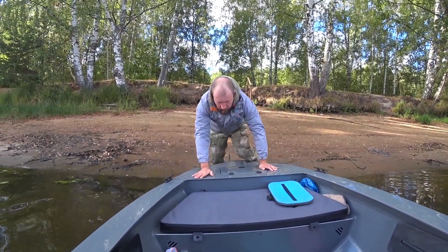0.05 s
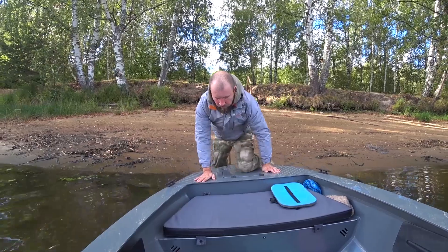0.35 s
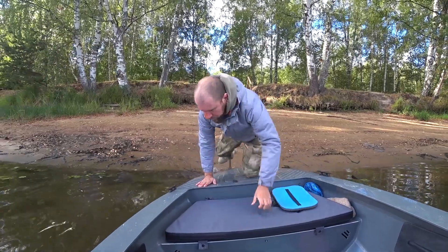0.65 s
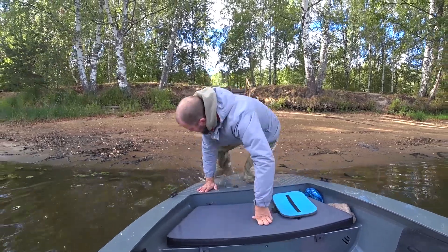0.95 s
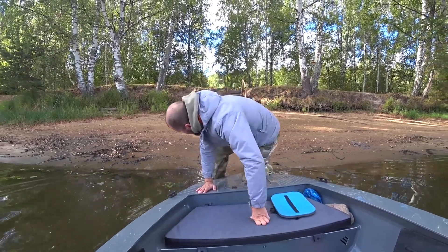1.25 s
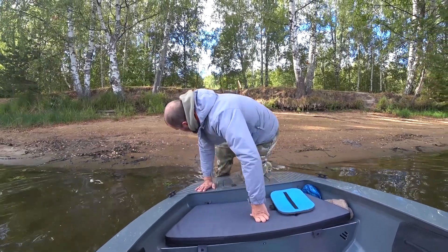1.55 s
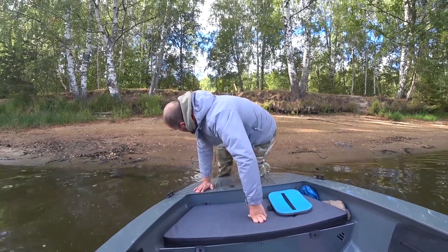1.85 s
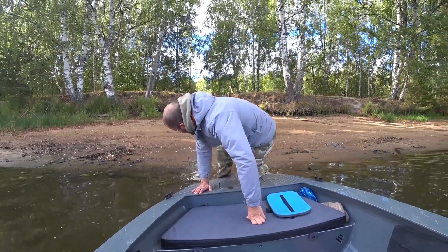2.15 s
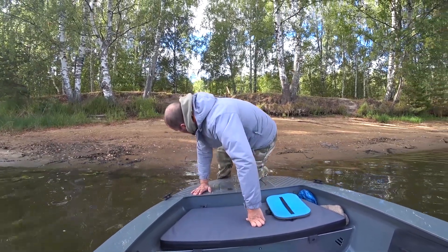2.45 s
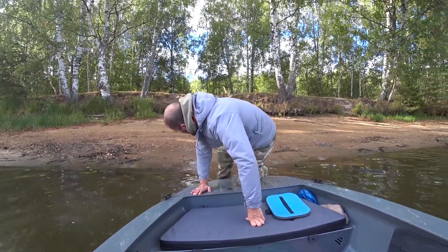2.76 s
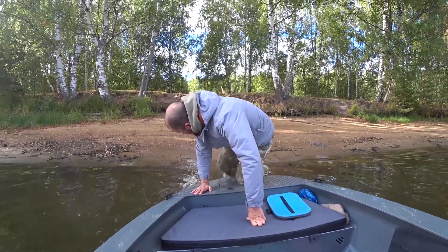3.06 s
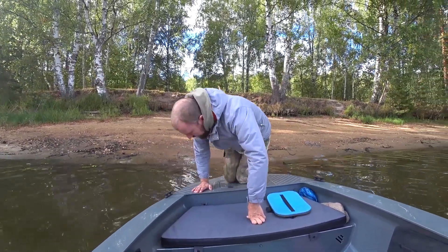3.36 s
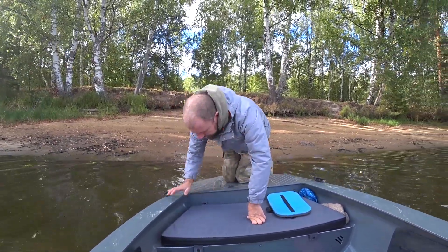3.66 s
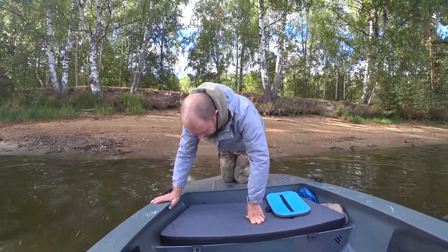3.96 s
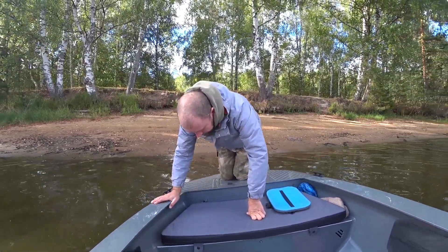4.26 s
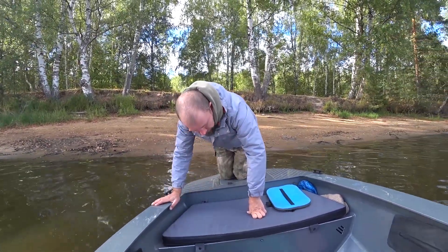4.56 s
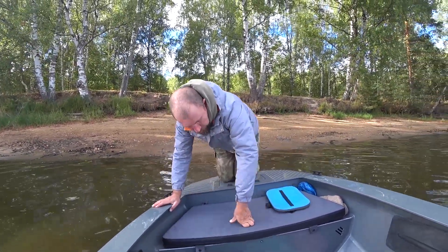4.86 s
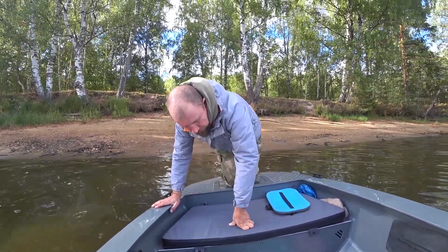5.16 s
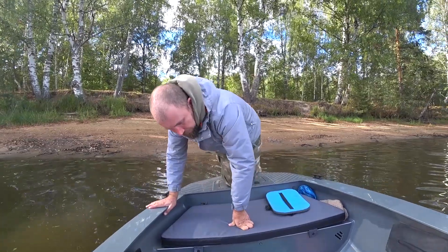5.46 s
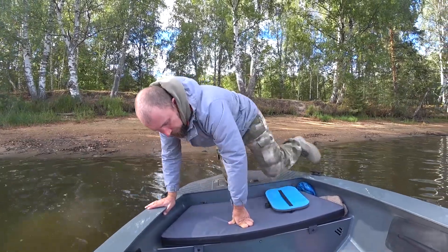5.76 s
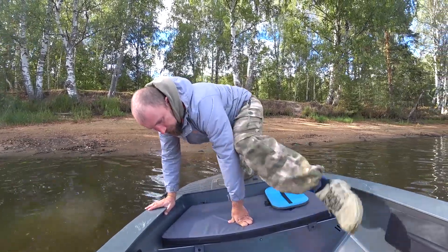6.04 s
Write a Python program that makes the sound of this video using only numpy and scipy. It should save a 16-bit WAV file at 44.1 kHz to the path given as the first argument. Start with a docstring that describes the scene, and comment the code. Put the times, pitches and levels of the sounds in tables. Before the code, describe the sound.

Someone pushes a small plastic boat off a lake shore, heard from on board. A cluster of hollow thumps and a sharp snap comes first. Wavelets then slap the bow, and water sloshes and drips around wading legs. A longer run of knocks follows as hands, knees and boots land on the hull, with scuffs and swishing clothes. A low hull rumble and a light breeze sit underneath.

```python
"""Hands, knees and boots knock on a small hollow plastic boat, pushed off a sandy lake shore.
Heard from on board: each blow rings the hull and wall modes; short clicks sound, a fitting snaps.
Palms and keel scuff, clothes swish as someone climbs in. Wavelets slap the bow; round wading legs,
water drips, splashes and sloshes with ringing bubbles. Behind: the rumble of the rocking hull,
an echo off the wooded bank, a light breeze in the trees."""
import sys
import numpy as np
from scipy import signal
from scipy.fft import rfft, irfft, next_fast_len
from scipy.io import wavfile
from scipy.ndimage import map_coordinates

SR = 44100
rng = np.random.default_rng(int(sys.argv[2]) if len(sys.argv) > 2 else 0)


def put_to_file(sound):
    """Save the sound as 16-bit audio at rate SR, in the file named by the first command-line argument."""
    columns = np.atleast_2d(sound).T  # one column per channel
    safe = np.clip(columns, -1, 1)
    whole_steps = np.round(safe * 32767)
    wavfile.write(sys.argv[1], SR, whole_steps.astype(np.int16))


N = 277824
AGE_S = np.arange(SR // 2) / SR  # since a contact
NOW_S = np.arange(N) / SR
PAN = np.array([[1], [-1]])  # left, right
BAND_HZ, TOP_HZ = 11200, 17000

# blows on the hull: t/s, level/dB, thud f/Hz, boom/dB re level, knock/dB re level
BLOWS = [(0.368, -36, 172, -10, -30), (0.411, -22.5, 125, 4, -9), (0.421, -19.5, 127, -6.5, -8),
         (0.434, -14.5, 194, -8, -8), (0.468, -21.5, 115, -28, -12.5), (0.495, -32, 105, -8, -8),
         (0.536, -25.5, 115, -22, -12), (0.63, -28, 134, -24, -27), (0.761, -20.5, 146, -14, -4.5),
         (0.786, -20, 151, -11.5, -6), (0.799, -13.5, 106, -17, -25), (3.334, -48.5, 431, -8, 10.5),
         (3.458, -34.5, 180, -7.5, -12), (3.619, -43, 300, -12, -1), (3.806, -23, 294, -28, -17),
         (3.818, -28, 150, -24, -6.5), (3.982, -17.5, 167, -34, -21), (3.987, -15, 226, -19, -4.5),
         (3.993, -17.5, 165, -21, -18), (4.268, -18, 228, -28, -8.5), (4.277, -13, 273, -17.5, -11.5),
         (4.331, -27, 170, -15, -14), (4.538, -20.5, 190, -13, -7), (4.55, -22.5, 423, -15, -3),
         (4.619, -40.5, 480, -5, 2.5), (4.662, -35, 154, -10, -22), (4.909, -25.5, 135, -15, -9),
         (5.116, -33.5, 182, -13, -13), (5.192, -15.5, 166, -23, -20), (5.205, -21, 100, -6, -34),
         (5.274, -42, 140, 10.5, 6), (5.331, -20.5, 324, -5, -12.5), (5.355, -23.5, 135, -2.5, -19.5),
         (5.536, -32, 275, -9.5, -2), (5.666, -21.5, 255, -9, -10), (6.065, -31, 208, -17, -8.5),
         (6.095, -34.5, 153, -15, -7)]
# hollow shell modes: f/Hz, level/dB, t60/s
HULL_MODES = [(38.4, -13.5, 0.48), (50.5, -4, 0.27), (62.5, 5.5, 0.19), (94.7, 4.5, 0.16),
              (113.8, 4.5, 0.13), (140.7, -10.5, 0.11), (159, -3, 0.15), (179.4, -0.5, 0.11),
              (225.4, -1, 0.093), (252.2, 1.5, 0.09), (295.7, 4, 0.076), (348.2, 8.5, 0.05),
              (398, 6, 0.042), (426, 6, 0.02), (510, 1.5, 0.059)]
# decay of the dense wall modes: f/Hz, t60/s
WALL_DECAY = [(300, 0.096), (800, 0.044), (2000, 0.03), (5000, 0.06), (11000, 0.02)]
# contact crack spectrum: f/Hz, level/dB
CRACK_EQ = [(1200, 11.5), (2500, 4), (4500, 2), (6500, 0.5), (10000, -10), (14000, -33)]
# short pitched clicks and rings, including two faint echoes of the snap and a splash's bright tick:
# t/s, level/dB, f/Hz
CLICKS = [(0.226, -32.5, 4360), (0.4424, -2, 5210), (0.4429, -21, 4700), (.513, -35, 2380),
          (.5336, -32.5, 2400), (0.632, -24.5, 95.5), (.763, -21.5, 660), (.788, -23.5, 544),
          (3.337, -32.5, 3060), (3.799, -35.5, 1300), (3.807, -21, 336), (3.811, -28.5, 1790),
          (3.818, -32, 1620), (3.825, -35, 114), (3.989, -16.5, 1925), (4.2697, -25, 4260),
          (4.270, -24.5, 1105), (4.279, -21.5, 2130), (4.333, -28, 206), (4.448, -36, 202),
          (4.551, -20, 526), (4.620, -28, 6000), (5.193, -19, 403), (5.274, -33, 1940),
          (5.325, -34.5, 1000), (5.332, -17.5, 364), (5.537, -29, 4480), (5.539, -25, 1137),
          (5.540, -26.5, 630), (5.6615, -20, 4400), (5.664, -26, 1103), (5.668, -22, 670)]
# palms, knees and keel sliding: centre t/s, level/dB, sigma/s, grit share 0-1
SCUFFS = [(0.443, -37.5, 0.012, 0.5), (0.763, -35, 0.0031, 0.5), (0.781, -33, 0.0069, 0.04),
          (0.81, -45.5, 0.031, 0.6), (1.108, -55.5, 0.044, 0.98), (2.812, -55, 0.016, 1),
          (2.912, -54.5, 0.012, 0.3), (3.608, -53, 0.009, .8), (3.819, -46, 0.013, 0.4),
          (4.856, -37, 0.036, 0.92), (5.406, -50, 0.026, 0.6), (6.248, -47.5, 0.025, .5)]
# gritty slip spectrum: f/Hz, level/dB
GRIT_EQ = [(300, -43), (700, -4.5), (1600, -3), (3000, -8), (5500, 3), (8000, -5.5), (11000, -10)]
# cloth and smooth rubbing spectrum: f/Hz, level/dB
RUB_EQ = [(600, -1), (2000, 5), (4000, 4), (5700, 3.5), (8000, -4.5), (11000, -8)]
# shoves and strides: centre t/s, sigma/s, water level/dB, cloth level/dB
MOVES = [(0.603, 0.28, -53.5, -64), (1.185, 0.21, -48, -58.5), (2.815, 0.084, -53, -63.5),
         (3.582, 0.06, -47.5, -67), (4.094, 0.075, -57, -65.5), (4.82, 0.21, -50.5, -54.5),
         (5.367, 0.26, -51, -75), (6.24, 0.24, -52, -58.5)]
# wavelets under the bow: t/s, slap level/dB, thud level/dB
LAPS = [(0.932, -32.5, -38), (0.997, -38.5, -41), (1.187, -32, -30), (1.379, -63, -41), (4.743, -33.5, -33)]
# splashes: t/s, level/dB, f/Hz
SPLASHES = [(0.225, -38.5, 1480), (1.336, -38, 3930), (1.343, -37, 1320), (1.394, -34.5, 3470),
            (1.407, -33, 2160), (1.542, -33.5, 1770), (1.771, -39, 4500), (1.819, -42.5, 4040),
            (2.295, -38, 5500), (2.357, -28.5, 2490), (2.366, -34.5, 4630), (2.724, -35.5, 4600),
            (2.779, -38, 1540), (2.820, -34, 872), (3.296, -34, 2830), (3.589, -35, 760),
            (5.72, -32.5, 6000)]
# single bubbles: t/s, level/dB, f/Hz
BUBBLES = [(.821, -34.5, 3760), (.909, -34.5, 3880), (1.301, -41.5, 2270), (1.344, -33.5, 4150),
           (1.359, -34, 1335), (1.410, -35.5, 2060), (1.526, -40.5, 1150), (2.349, -39, 1790),
           (2.356, -34.5, 2330), (3.009, -46, 2390), (3.109, -38, 6160), (3.620, -40.5, 653),
           (3.708, -47.5, 890)]
# stirred water spectrum: f/Hz, level/dB
WASH_EQ = [(150, -5), (400, 2), (900, -1.5), (2000, -9), (4000, -17), (9000, -25)]
# rocking hull spectrum: f/Hz, level/dB
RUMBLE_EQ = [(15, -6), (42, -3), (70, -8.5), (110, -10.5), (200, -11.5), (400, -17), (900, -65)]
# bank echo spectrum: f/Hz, level/dB
BANK_EQ = [(150, -12), (500, -11), (1300, -10), (1900, -2), (2250, 0), (2800, -12), (5000, -20),
           (9000, -22)]
# breeze spectrum: f/Hz, level/dB
BREEZE_EQ = [(12, -43), (20, -2), (49, -11.5), (129, -16), (282, -8), (418, -10), (464, -12.5),
             (1050, -14.5), (1160, -17), (1320, -13), (2980, -21), (5450, -21.5), (10500, -29.5),
             (13600, -65), (22000, -120)]
# breeze strength: t/s, level/dB
BREEZE_LEVELS = [(0, -54.5), (2.1, -56.5), (2.55, -59), (3.0, -56.5), (6.3, -53)]
# open-air stereo field: f/Hz, left-right coherence
AIR_COHERENCE = [(100, 0.95), (300, 0.36), (800, 0.057), (2000, 0.033), (8000, 0.6)]
# stereo field on the bow: f/Hz, left-right coherence
BOW_COHERENCE = [(150, 0.64), (600, 0.79), (2000, 0.63), (8000, 0.86)]
# bow balance: f/Hz, left minus right/dB
BOW_BALANCE = [(120, .1), (260, -.6), (550, -2.8), (1200, -2.2), (2200, -3.4), (5000, -3), (9000, -3.5)]


def blows(boom_hz=56.3, soft_knock_hz=628, soft_knock_db=-35, db_per_octave=26):
    """Each blow thuds in a panel, booms in the shell, knocks and cracks; harder knocks are brighter."""
    out = np.zeros((2, N))
    for t_s, db, thud_hz, boom_db, knock_db in BLOWS:
        knock_hz = soft_knock_hz * 2 ** (max(db + knock_db - soft_knock_db, 0) / db_per_octave)
        thud = shell_ring(thud_hz, octaves=0.49, rise_s=0.0052, damping=1.3)
        boom = shell_ring(boom_hz, octaves=0.59, rise_s=0.0078, damping=1.0)
        knock = slap(lambda hz: bell(hz, knock_hz, octaves=1.0), rise_s=0.0014, damping=1.2)
        crack = slap(lambda hz: amp(curve(CRACK_EQ, hz)), rise_s=0.0006, damping=1.67)
        add(out, t_s, amp(db - 8) * thud)
        add(out, t_s, amp(db + boom_db) * boom)
        add(out, t_s, amp(db + knock_db - 8.5) * knock)
        add(out, t_s, amp(db + knock_db - 14.5) * crack)
    return out


def shell_ring(centre_hz, octaves, rise_s, damping):
    """A blow's place and softness pick a band of hull modes; they start together and drift apart."""
    hz, db, t60_s = np.transpose(HULL_MODES)[:, :, None]
    jitter_db, phase, pan = rng.standard_normal((3, len(HULL_MODES), 1))
    t_s = AGE_S[:SR // 3]
    gain = amp(db + jitter_db - 60 * damping * t_s / t60_s) * bell(hz, centre_hz, octaves)
    modes = gain * np.sin(2 * np.pi * hz * t_s + np.pi / 12 * phase)
    mid = modes.sum(axis=0)
    side = np.sum(pan * bell(hz, 300, octaves=1) / 8 * modes, axis=0)  # upper modes radiate unevenly
    return unit_onset((mid + PAN * side) * attack(t_s, rise_s))


def slap(response, rise_s, damping):
    """Dense modes: a noise burst, each band dying at the plastic wall's rate times damping."""
    burst = stereo(rng.standard_normal((2, len(AGE_S) // 2)), [(1000, 0)], BOW_COHERENCE)
    hz, t_s, bands = signal.stft(filtered(burst, response), SR, nperseg=128)
    decay = amp(-60 * damping * t_s / curve(WALL_DECAY, hz)[:, None])
    ring = signal.istft(bands * decay, SR, nperseg=128)[1]
    return unit_onset(ring * attack(AGE_S[:ring.shape[1]], rise_s))


def clicks(t60_cycles=22.4):
    """Short clicks and rings, each a damped sine; the higher ones also rasp."""
    out = np.zeros(N)
    for t_s, db, hz in CLICKS:
        rasp = 0.21 * min(hz / 3000, 1) ** 2
        ring = np.sin(2 * np.pi * hz * AGE_S) + rasp * rng.standard_normal(len(AGE_S))
        envelope = amp(db - 60 * AGE_S * hz / t60_cycles) * attack(AGE_S, 0.18 / hz)
        add(out, t_s, envelope * ring)
    return out


def snap(t_s=0.4412, db=-9, hz=10500, t60_s=0.00091):
    """A loaded fitting lets go: one sharp tick."""
    out = np.zeros(N)
    add(out, t_s, amp(db - 60 * AGE_S / t60_s) * np.sin(2 * np.pi * hz * AGE_S))
    return out


def sizzle(t_s=0.762, db=-39.5, centre_hz=9800, decay_s=0.059):
    """A sleeve's zipper jingles: thin, bright specks that fade quickly."""
    impulses = grains(per_s=220, spread_db=5)
    specks = unit_rms(filtered(impulses, lambda hz: bell(hz, centre_hz, octaves=0.11)))
    age_s = np.maximum(NOW_S - t_s, 0)
    return amp(db) * specks * np.exp(-age_s / decay_s) * attack(age_s, rise_s=0.0019)


def scuffs():
    """Skin, knees and sand slide on the hull: smooth hiss plus tiny slips."""
    smooth_gain, rough_gain = np.zeros((2, N))
    for t_s, db, sigma_s, grit in SCUFFS:
        stroke = amp(db) * swell(t_s, sigma_s)
        smooth_gain += stroke * np.sqrt(1 - grit)
        rough_gain += stroke * np.sqrt(grit)
    slips = stereo(grains(per_s=2500, spread_db=6), GRIT_EQ, BOW_COHERENCE)
    return smooth_gain * noise(RUB_EQ, BOW_COHERENCE) + rough_gain * slips


def stirring(idle_water_db=-61.5, idle_cloth_db=-68):
    """Water and cloth gains: each move adds power to a quiet idle."""
    water_power, cloth_power = amp(idle_water_db) ** 2, amp(idle_cloth_db) ** 2
    for t_s, sigma_s, water_db, cloth_db in MOVES:
        move = swell(t_s, sigma_s)
        water_power += (amp(water_db) * move) ** 2
        cloth_power += (amp(cloth_db) * move) ** 2
    return np.sqrt(water_power), np.sqrt(cloth_power)


def clothes(gain):
    """Moving cloth: a grainy, fluttering hiss."""
    fibres = rng.standard_normal((2, N)) + 0.7 * grains(per_s=700, spread_db=7)
    flutter = amp(3 + 2.5 * wobble(knots_per_s=45))
    return gain * flutter * stereo(fibres, RUB_EQ, AIR_COHERENCE)


def laps(knock_hz=630, thud_hz=137):
    """Water slaps the hull from below: a dull knock in the wall, a small thud in the shell."""
    out = np.zeros((2, N))
    for t_s, slap_db, thud_db in LAPS:
        knock = slap(lambda hz: bell(hz, knock_hz, octaves=0.79), rise_s=0.0011, damping=1.03)
        thud = shell_ring(thud_hz, octaves=0.62, rise_s=0.0029, damping=2.4)
        add(out, t_s, amp(slap_db - 9.5) * knock)
        add(out, t_s, amp(thud_db - 7.5) * thud)
    return out


def splashes():
    """Each splash: a slap and a spray of five tiny bubbles."""
    out = np.zeros((2, N))
    for t_s, db, centre_hz in SPLASHES:
        splash = slap(lambda hz: bell(hz, centre_hz, octaves=0.83), rise_s=0.0003, damping=0.84)
        for delay, pitch, size, pan in rng.standard_normal((5, 4)):
            bubble_hz = min(centre_hz * np.exp(0.3 * pitch), BAND_HZ)
            gains = amp(-1 + 2 * size + pan * PAN)
            add(splash, 0.004 * abs(delay), gains * bubble(bubble_hz, t60_cycles=45, glide=0.15))
        add(out, t_s, amp(db - 16.5) * splash)
    return out


def plops(drip_count=9, wading_s=(1.4, 5.2), drip_db=-53, drip_hz=1856):
    """Single bubbles, plus faint random drips during the wading."""
    out = np.zeros((2, N))
    drips = []
    for size, pitch in rng.uniform(-1, 1, (drip_count, 2)):
        drips.append((rng.uniform(*wading_s), drip_db + 4 * size, drip_hz * 2 ** pitch))
    for t_s, db, hz in BUBBLES + drips:
        add(out, t_s, amp(db + 0.7 * PAN) * bubble(hz, t60_cycles=65, glide=0.207))
    return out


def slosh(gain, bubble_count=800, median_hz=1100):
    """Stirred water: a patchy wash full of small bubbles."""
    fizz = np.zeros((2, N))
    for pitch, size, pan in rng.standard_normal((bubble_count, 3)):
        hz = min(median_hz * np.exp(0.6 * pitch), BAND_HZ)
        gains = amp(3 * min(size, 1.5) + 2 * pan * PAN)
        add(fizz, rng.uniform(0, N / SR), gains * bubble(hz, t60_cycles=38, glide=0.25))
    wash = noise(WASH_EQ, AIR_COHERENCE) * amp(4 * wobble(knots_per_s=25))
    return gain * amp(-5) * (wash + 0.65 * unit_rms(fizz))


def bubble(hz, t60_cycles, glide):
    """A bubble rings, its pitch rising as it nears the surface."""
    t_s = AGE_S[:SR // 8]
    t60_s = t60_cycles / hz
    phase = 2 * np.pi * hz * (t_s + glide * t_s ** 2 / (2 * t60_s))
    return np.sin(phase) * amp(-60 * t_s / t60_s) * attack(t_s, 0.38 / hz)


def rocking(idle_db=-57.5, re_boom_db=-21.5, fade_db_per_s=36.5):
    """The hull rumbles on the water: each blow's weight rocks it, and it settles slowly."""
    kicks = np.zeros(N)
    for t_s, db, _, boom_db, _ in BLOWS:
        kicks[round(t_s * SR)] += amp(db + boom_db + re_boom_db) ** 2
    retained = amp(-fade_db_per_s / SR) ** 2
    power = amp(idle_db) ** 2 + signal.lfilter([1], [1, -retained], kicks)
    return np.sqrt(power) * noise(RUMBLE_EQ, AIR_COHERENCE)


def bank_echo(x, delay_s=0.0725, blur_s=0.0024, t60_s=0.88, scatter_db=-7):
    """The bank returns a blurred echo; the trunks behind scatter a tail."""
    reflection = np.exp(-0.5 * ((AGE_S - delay_s) / blur_s) ** 2)
    tail = amp(scatter_db - 60 * AGE_S / t60_s) * attack(AGE_S, rise_s=0.002)
    impulse = noise(BANK_EQ, AIR_COHERENCE, len(AGE_S)) * (reflection + tail)
    return signal.fftconvolve(x, impulse / np.linalg.norm(impulse[0]), axes=1)[:, :N]


def breeze():
    """Air in the trees: broad noise, drifting in level."""
    db = np.interp(NOW_S, *np.transpose(BREEZE_LEVELS)) + 0.23 * wobble(knots_per_s=1.43)
    return amp(db) * noise(BREEZE_EQ, AIR_COHERENCE)


def amp(db):
    """dB to gain."""
    return 10 ** (np.asarray(db) / 20)


def unit_rms(x):
    """Scale to rms 1."""
    return x / np.sqrt(np.mean(x ** 2) + 1e-20)


def unit_onset(x):
    """Scale to rms 1 over the first 20 ms."""
    return x / np.sqrt(np.mean(x[..., :SR // 50] ** 2) + 1e-20)


def attack(t_s, rise_s):
    """Exponential rise to 1."""
    return 1 - np.exp(-t_s / rise_s)


def swell(t_s, sigma_s):
    """Gaussian envelope about t_s."""
    return np.exp(-0.5 * ((NOW_S - t_s) / sigma_s) ** 2)


def wobble(knots_per_s):
    """Smooth random curve."""
    knots = rng.standard_normal(int(N * knots_per_s / SR) + 4)
    return map_coordinates(knots, [NOW_S * knots_per_s])


def grains(per_s, spread_db):
    """Two channels of sparse, uneven impulses."""
    chance, size = rng.random((2, N)), rng.standard_normal((2, N))
    heights = np.sign(size) * amp(spread_db * np.minimum(abs(size), 2.5))
    return unit_rms((chance < per_s / SR) * heights)


def curve(points, hz):
    """Interpolate (f/Hz, value) points over log frequency."""
    knots_hz, values = np.transpose(points)
    return np.interp(np.log(hz + 1), np.log(knots_hz + 1), values)


def bell(hz, centre_hz, octaves):
    """Gaussian gain over log frequency."""
    return np.exp(-0.5 * (np.log2((hz + 1) / centre_hz) / octaves) ** 2)


def filtered(x, response):
    """Apply response(hz) by FFT."""
    n = x.shape[-1]
    padded = next_fast_len(n + SR // 4)
    return irfft(rfft(x, padded) * response(np.fft.rfftfreq(padded, 1 / SR)), padded)[..., :n]


def lowpass(x, edge_hz):
    """Steep treble cut."""
    return filtered(x, lambda hz: 1 / (1 + (hz / edge_hz) ** 90))


def stereo(pair, eq, coherence):
    """Two unrelated signals to left and right at rms 1, with a given spectrum and coherence."""
    def response(hz):
        angle = np.arccos(np.clip(curve(coherence, hz), -1, 1)) / 2
        return amp(curve(eq, hz)) * [np.cos(angle), np.sin(angle)]
    mid, side = filtered(pair, response)
    return unit_rms(mid + PAN * side)


def noise(eq, coherence, n=N):
    """Coloured stereo noise, rms 1."""
    return stereo(rng.standard_normal((2, n)), eq, coherence)


def add(track, t_s, sound):
    """Mix sound into track at t_s."""
    start = int(np.clip(round(t_s * SR), 0, N - 1))
    track[..., start:start + sound.shape[-1]] += sound[..., :N - start]


def from_bow(x, lag_s=1.9e-5):
    """The bow lies slightly right: the left ear gets it weaker and later."""
    def response(hz):
        balance = amp(curve(BOW_BALANCE, hz) * PAN / 2)
        return balance * np.exp(-2j * np.pi * hz * lag_s * PAN / 2)
    return filtered(x, response)


def scene():
    """Bow, water, echo and background, low-passed; the snap bypasses echo and low-pass."""
    water_gain, cloth_gain = stirring()
    bow = from_bow(blows() + laps() + scuffs() + clothes(cloth_gain) + clicks() + sizzle())
    water = plops() + splashes() + slosh(water_gain)
    echo = amp(-21) * bank_echo(bow + water)
    mix = bow + water + echo + rocking() + breeze()
    return lowpass(mix, BAND_HZ) + from_bow(snap())


def record(dry):
    """Output band limit."""
    return lowpass(dry, TOP_HZ)


dry = scene()
out = record(dry)
put_to_file(out)
```